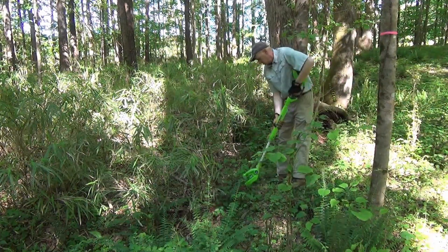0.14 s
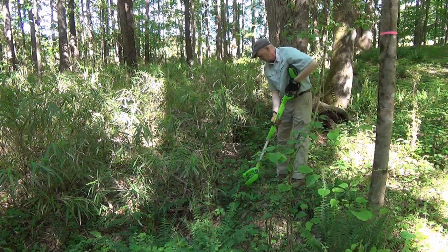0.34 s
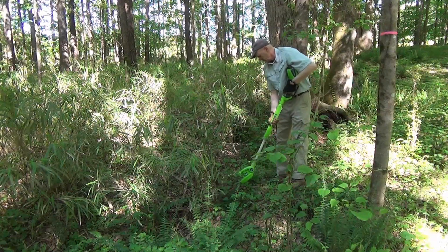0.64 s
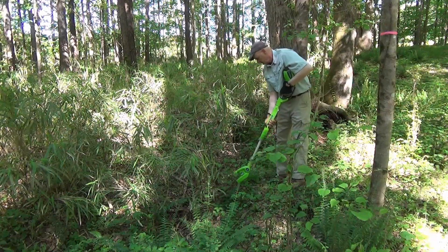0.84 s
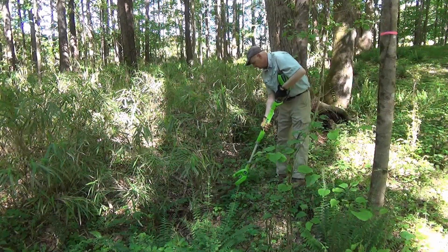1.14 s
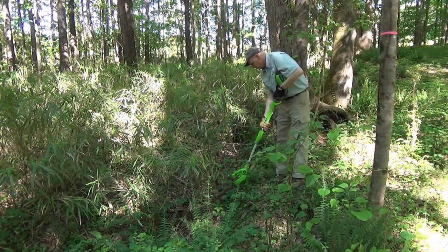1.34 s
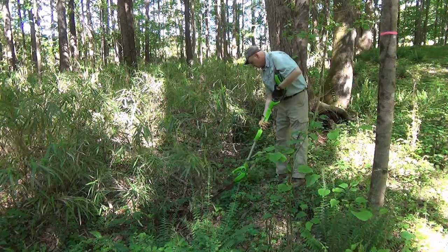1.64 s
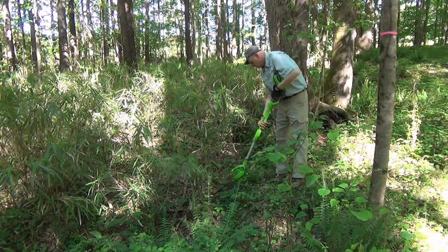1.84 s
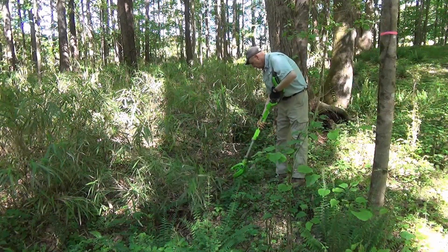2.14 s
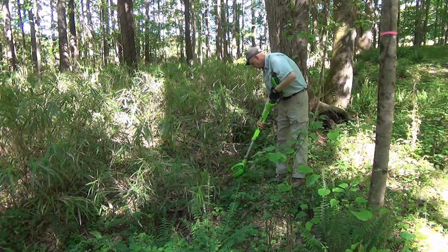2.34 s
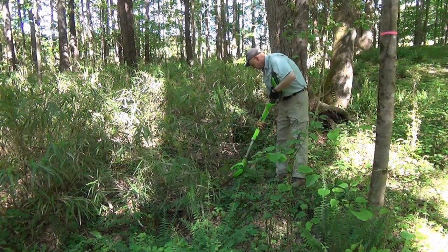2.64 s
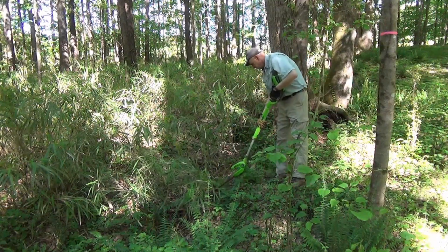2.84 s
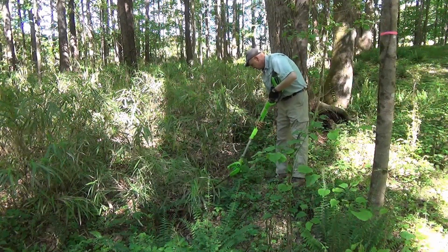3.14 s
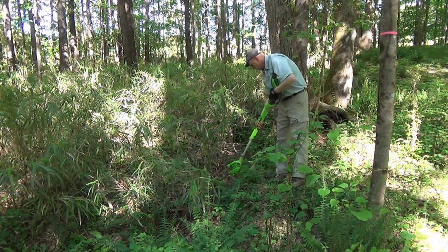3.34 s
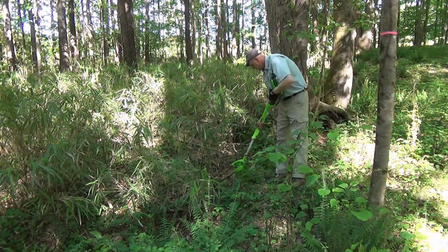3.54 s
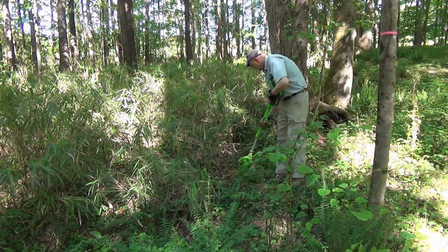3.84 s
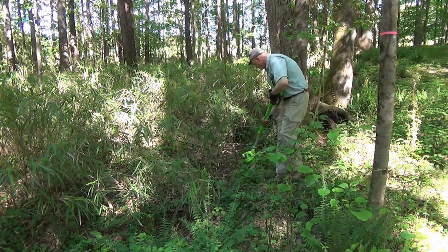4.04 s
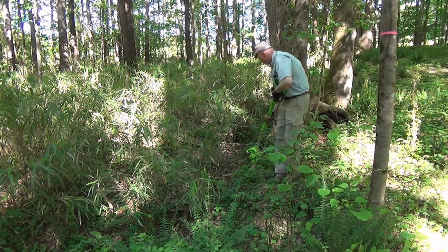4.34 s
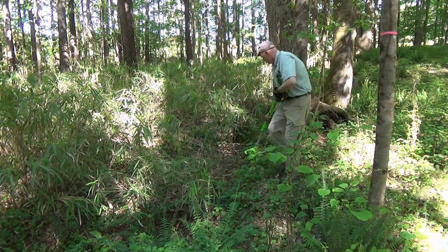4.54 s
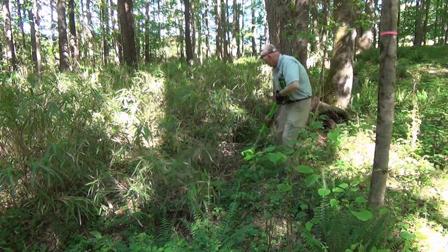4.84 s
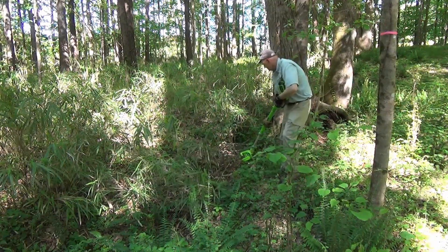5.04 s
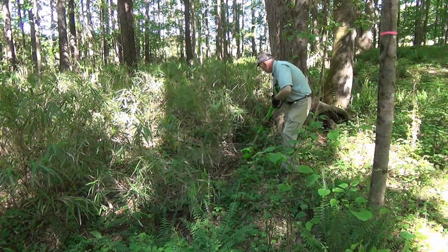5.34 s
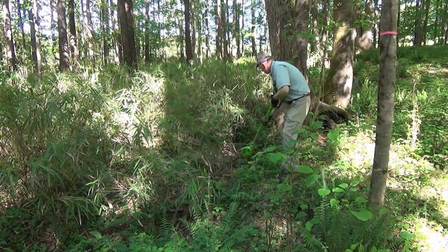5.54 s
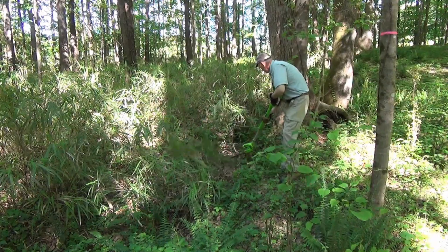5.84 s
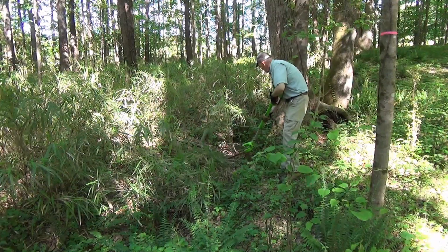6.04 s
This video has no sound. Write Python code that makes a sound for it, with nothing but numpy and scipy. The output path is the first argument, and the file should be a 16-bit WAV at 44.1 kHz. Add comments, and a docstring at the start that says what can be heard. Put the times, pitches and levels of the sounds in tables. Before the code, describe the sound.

Outdoors in woodland, two microphones face an electric pole hedge trimmer, centred in stereo. A faint leaf wash and low distant rumble with a hum open the scene. From 0.13 to 0.23 seconds small plastic trigger clicks tick, the strongest near 0.2. At 0.3 brief electronic motor tones sing and a rough gear whine climbs unevenly, while the blades knock slowly, then faster. By about 0.8 they run steadily at twenty-six cycles a second, two knocks each: a harsh, bright metallic buzz-rattle with thin ringing teeth and a hollow pole underneath. Stems snap often until 1.2, then sporadically; brush swishes near 1.6, 2.3, 2.8 and 5.4 to 5.6. The rattle eases after 1.8, its speed wavering slightly under load. From about 4 the bar sinks into weeds, sounding denser and less bright. Low rumble swells faintly around 3.5 to 4.2 and after 5.3. Sparse tree echoes follow; the trimmer is still running at the end, just past 6.

```python
"""An electric pole hedge trimmer straight ahead of two microphones in woodland, cutting through weeds.
A cam drives the blades to and fro about 26 times a second; each reversal knocks and sets off a rattle
that rings in cutter bar, teeth, housing and pole, while snapping stems shake the whole tool.
Before that the trigger clicks and the gear whine of the motor climbs to speed.
Behind are a faint wash of leaves, a far rumble that swells, with a hum, and sparse echoes from the trees."""
import sys
import numpy as np
from scipy import signal
from scipy.io import wavfile
from scipy.ndimage import uniform_filter1d

SR = 44100
rng = np.random.default_rng(int(sys.argv[2]) if len(sys.argv) > 2 else 0)


def store_wav(level_fs):
    """Save 16-bit WAV to argv[1]."""
    pcm = np.round(np.clip(np.atleast_2d(level_fs), -1, 1) * 32767)
    wavfile.write(sys.argv[1], SR, pcm.T.astype(np.int16))


N = 272489
T = np.arange(N) / SR  # time in s

# Colour of the leaf wash before its band limits: pitch_hz, density_db (per Hz, relative)
LEAF_COLOUR = [(59, -33), (100, -21), (201, -9), (276, 18), (1270, 9), (2340, 5), (6200, 3.5),
               (13300, -5.5), (15700, -47)]
# Far rumble, which fades early and partly returns at the end, before its lumps: time_s, level_db
RUMBLE = [(0, -51), (.45, -57.5), (.65, -69.5), (1.4, -72), (1.9, -84), (3.2, -91), (4.5, -78), (6.18, -70)]
# Swells of the low rumble: start_s, level_db (at the height of the swell)
RUMBLE_SWELLS = [(2.178, -69), (3.501, -61.5), (3.894, -59), (4.17, -63), (5.336, -64), (5.459, -60),
                 (6.05, -66)]
# Part of the echoes that is opposite at the two microphones: pitch_hz, level_db
SIDE_COLOUR = [(60, -17), (150, -12), (380, -16), (950, -23.5), (2380, -24), (5980, -23.5), (15000, -11)]

# Clicks of the trigger parts: start_s, level_db (peak before the band limits), brightness_db (per octave)
TRIGGER_CLICKS = [(.1257, -23, 4), (.1272, -26, 0), (.143, -35, -12), (0.158, -41, -9), (0.186, -30, -12),
                  (0.1932, -26, 5), (.195, -27, 3), (0.2016, -21, 5), (0.2036, -13, -1), (.2075, -24, -6),
                  (0.217, -30, 4), (.229, -33, -11)]
# The one trigger body that rings under every click: pitch_hz, level_db (relative), t60_s
TRIGGER_BODY = [(410, -11, .045), (1750, 1, .017), (2800, -5, .022), (4400, -9, .015), (6100, -16, .03)]

# Level of the gear whine: time_s, level_db
WHINE_LEVEL = [(.33, -48), (.352, -24), (.395, -25), (.42, -30), (.44, -34), (.462, -27), (.48, -48),
               (.63, -40), (.8, -50), (1.6, -44), (3.9, -46), (4.3, -55)]
# Gear whine races through the slack, catches the blades, sags and climbs again: time_s, pitch_hz
SPIN_UP_PITCH = [(.33, 600), (.348, 780), (.366, 1230), (.384, 860), (.401, 1130), (.425, 1470),
                 (.445, 1750), (.462, 2070), (.475, 2230), (.49, 2400)]
# Rough partial while it climbs: multiple (of the whine pitch), level_db (relative)
SPIN_UP_PARTS = [(1.5, -9)]
# Partials at full speed, the lower being the shaft: multiple (of the whine pitch), level_db (relative)
FULL_SPEED_PARTS = [(.1, -10), (1.5, -4)]
# Tones of the motor drive as current comes on: pitch_hz, level_db, start_s, end_s
DRIVE_TONES = [(1003, -44, .305, .33), (1998, -40, .297, .37), (2998, -42, .297, .35),
               (2998, -36, .35, .49), (4992, -47, .297, .35)]

# Load holds the cam back or lets it run ahead, before smoothing and sharing: time_s, lag_ms
LOAD_LAG = [(.45, 12), (.6, 2), (.78, 0), (1.3, -1.6), (2.2, 2.5), (3.1, -3.2), (3.65, -3.5), (4.33, 1.7),
            (4.6, -1.3), (5.34, -5.2), (5.8, 1.4), (6.18, .6)]
# The two reversals of a turn: at_turns (0-1), knock_db, slide_db (sliding rattle), thump_db (in the pole)
REVERSALS = [(0, 3.5, 5, 5.5), (.49, 3.5, 3.5, 2)]
# Running level before layer trims: time_s, bar_db, housing_db (above the bar)
RUNNING_LEVEL = [(.297, -41, 5), (.35, -22, -1.5), (.4, -16.5, -4.5), (.57, -22.5, -1), (.98, -21, -4),
                 (1.78, -24, -6), (2.06, -27, -6), (3.0, -27, -7), (3.47, -26, -6), (4.04, -28, -6.5),
                 (4.72, -25, -9.5), (5.3, -28.5, -7), (5.6, -25.5, -8.5), (6.18, -30.5, -8.5)]
# How far the bar is sunk in the weeds: time_s, share (0-1)
SUNK = [(.3, 0.9), (1.6, 0), (2, 0), (4.1, 0.6), (4.5, 1), (6.18, 1)]
# Broad colour of the tool: pitch_hz, density_db (per Hz, relative)
TOOL_COLOUR = [(88, -47), (150, -27), (280, -7), (438, -10), (520, -13.5), (832, -1.5), (1070, -1),
               (1250, 0), (1850, -2), (2160, -5), (3870, -0.5), (8110, 1), (10300, 1.5), (12900, -0.5),
               (15700, -15.5)]
# Resonances of the tool: pitch_hz, width_hz, clear_db (lift with the bar clear), sunk_db (lift when sunk)
TOOL_MODES = [(310, 90, 4, 4), (800, 200, 4, 2), (1040, 250, 5, 2), (1520, 130, 0, 7), (1830, 120, 3, 3.5),
              (2380, 300, 0, 5), (2950, 300, 2, 2), (3870, 190, 4, 4), (6750, 500, -3, -5),
              (7450, 280, 5, 3), (10300, 900, 2, 4)]
# Thin rings of the teeth: pitch_hz
TEETH_HZ = [9505, 9870, 10245, 10525, 11430, 11960, 12200, 12595, 13230]
# Rings of the bar that drift as it is turned and swept, one table a ring: time_s, pitch_hz, level_db (re bar)
DRIFTING_RINGS = [
    [(.4, 1790, -17), (1.4, 1804, -12), (2.3, 1840, -13), (3.7, 1860, -12), (4.5, 1827, -12),
     (6.18, 1820, -14)],
    [(.5, 3600, -15), (.85, 3900, -11), (1.4, 3860, -12), (2.5, 3860, -17), (3.7, 3850, -13),
     (4.2, 3930, -13), (6.18, 3930, -14)],
    [(.4, 2990, -14), (1.6, 2960, -14), (2.8, 2950, -20), (3.2, 3010, -16), (3.55, 2870, -12),
     (4.0, 2830, -8), (4.3, 3020, -14), (5.2, 2990, -14), (6.18, 2800, -25)],
    [(.5, 5250, -22), (.7, 5380, -15), (1.3, 5600, -14), (1.9, 5600, -15), (2.1, 5600, -40)],
    [(.6, 4300, -30), (1, 4450, -14), (1.9, 4520, -15), (2.3, 4500, -26), (3.4, 4500, -15),
     (4.2, 4400, -36)],
]
# Brush swishing through the teeth: time_s (centre), level_db (before layer trims), length_s
SWISHES = [(1.58, -34, 0.0087), (1.656, -21, 0.0079), (2.323, -29.5, 0.023), (2.842, -26.5, 0.018),
           (5.363, -25.5, 0.012), (5.585, -26, 0.0062)]
# Hardest knocks and stems snapping in the teeth: start_s, strength_db, pitch_hz (at which the bar rings on)
SNAPS = [(0.393, -13, 1090), (0.447, -24, 1200), (0.5167, -11, 1090), (0.543, -12, 4960),
         (0.568, -10, 4070), (0.6142, -8, 5390), (0.659, -8, 7690), (.699, -4, 7100), (0.776, -9, 1010),
         (0.8515, -6, 4200), (0.928, -6, 1800), (1.003, -8, 2780), (1.1534, -8, 3700), (1.609, -10, 1030),
         (1.842, -8, 5570), (2.2927, -9, 3900), (2.8156, -13, 1980), (3.116, -11, 5000),
         (3.2344, -14, 1870), (3.235, -11, 3160), (3.3816, -11, 1843), (3.6068, -9, 2810),
         (3.7966, -9, 5500), (3.892, -10.5, 2880), (4.4465, -9.5, 1440), (4.591, -10.5, 3880),
         (5.0423, -13, 5400), (4.815, -13, 5260), (4.972, -11, 5130), (5.579, -11, 2320),
         (6.125, -14, 1900)]

LEAVES_DB = -47
CLACK_DB, CLACK_T60_S = -4, .045
CAM_START_S, SPIN_UP_S, TURNS_PER_S, FIRST_TURN = .29, .53, 26.47, .21
CAM_LAG_SHARE, MOTOR_LAG_SHARE = .7, .35  # the motor feels less of the load's lag than the cam
TEETH_PER_TURN = 162.3  # gear teeth meshing in one cam turn
RISE_TURNS, KNOCK_TURNS, THUMP_LAG_TURNS, THUMP_TURNS = .039, .04, .1, .075
POLE_SLIDE = .45  # share of the sliding rattle's dB that reaches the pole
TOOTH_WIDTH_HZ, TOOTH_LIFT_DB = 70, 5
SURGE_DB, CLUMP_DB = .66, 1.3
SIZZLE_DB, SIZZLE_FADE_DB_PER_S, SIZZLE_DULL = -7.5, -.29, 3.1
POLE_DB, POLE_FOLLOWS = -28.5, .67  # the hollow pole follows the bar's level in part
DRIFT_WIDTH_HZ = 235
SNAP_S, SNAP_RING_DB, SNAP_RING_T60_S = .0016, -12, .045
EDGE_HZ = 15780


def amp(db):
    """Decibels to gain."""
    return 10 ** (np.asarray(db) / 20)


def evened(x):
    """Scales to rms 1."""
    return x / np.sqrt(np.mean(x ** 2) + 1e-20)


def curves(rows, at):
    """Every column after the first, joined by straight lines."""
    first, *columns = np.transpose(rows)
    return [np.interp(at, first, c) for c in columns]


def slow_noise(samples, passes=1):
    """Random wander of rms 1: white noise under a moving average."""
    x = rng.standard_normal(N)
    for _ in range(passes):
        x = uniform_filter1d(x, size=samples)
    return evened(x)


def coloured(x, db_at):
    """Minimum-phase (causal) filter whose level in dB is db_at(Hz)."""
    hz = abs(np.fft.fftfreq(8192, 1 / SR))
    log_gain = np.log(amp(np.maximum(db_at(hz), -100)))
    phase = -signal.hilbert(log_gain).imag
    taps = np.fft.ifft(np.exp(log_gain + 1j * phase)).real[:4096]
    return signal.oaconvolve(x, taps)[:N]


def spectrum(points, hz):
    """Reads (Hz, dB) points on a log-frequency axis."""
    f, db = np.transpose(points)
    return np.interp(np.log(hz + 1), np.log(f + 1), db)


def band(hz, lo_hz, hi_hz):
    """Steep band-pass in dB."""
    return -10 * np.log10((1 + (lo_hz / (hz + 1)) ** 12) * (1 + (hz / hi_hz) ** 12))


def resonate(x, hz, width):
    """Moving resonance of rms 1: shifts the curve hz down to zero, smooths, and shifts back."""
    turn = np.exp(2j * np.pi * np.cumsum(hz * np.ones(len(x))) / SR)
    r = np.exp(-np.pi * width / SR)
    smooth = signal.lfilter([1 - r], [1, -r], x / turn)
    return evened((turn * smooth).real)


def air():
    """Woodland behind the tool: leaf wash is broad noise, the rumble swelling low noise, the hum a sine."""
    wash = [coloured(rng.standard_normal(N), lambda hz: spectrum(LEAF_COLOUR, hz) + band(hz, 170, 17000))
            for _ in range(3)]
    low = [evened(coloured(rng.standard_normal(N), lambda hz: band(hz, 50, 172))) for _ in range(2)]
    lumps_db = np.minimum(T, 1) * 2.5 * slow_noise(4000)
    rumble = amp(curves(RUMBLE, T)[0]) * amp(lumps_db)
    swells = sum(amp(db) * np.exp(-((T - s - .03) / .037) ** 2) for s, db in RUMBLE_SWELLS)
    hum = .8 * rumble * np.sin(2 * np.pi * 63 * T)
    # a shared part in the middle, a little of its own at each microphone
    leaves = amp(LEAVES_DB) * evened(wash[0] + .084 * np.array(wash[1:]))
    low_stereo = low[0] + np.array([[.17], [-.17]]) * low[1]
    return leaves + hum + (rumble + swells) * low_stereo


def scattered(x, t60):
    """Sparse echoes of random sign from trunks and brush, dying away by 60 dB in t60 seconds."""
    t = np.arange(SR // 3) / SR
    hits = rng.choice([-1, 1], len(t)) * (rng.random(len(t)) < .05)
    taps = hits * amp(-60 * t / t60) * (t > .002)
    return signal.oaconvolve(x, taps / np.linalg.norm(taps))[:N]


def patchy(x, patchy_db):
    """The tool's colour varies at random in soft patches of time and pitch."""
    z = signal.stft(x, nperseg=512, noverlap=384)[2]
    patches = rng.standard_normal(z.shape[::-1]).T
    for _ in range(2):
        patches = uniform_filter1d(uniform_filter1d(patches, size=4, axis=0), size=30, axis=1)
    return signal.istft(z * amp(patchy_db * evened(patches)), nperseg=512, noverlap=384)[1][:N]


def trigger():
    """Plastic clicks: a dry clack of noise over the decaying modes of the trigger body."""
    out, t = np.zeros(N), np.arange(3000) / SR
    for s, db, tilt_db in TRIGGER_CLICKS:
        body = sum(amp(d + tilt_db * np.log2(hz / 1500) - 60 * t / t60) * np.sin(2 * np.pi * hz * t)
                   for hz, d, t60 in TRIGGER_BODY)
        # a brighter click has a higher and wider clack
        noise = resonate(rng.standard_normal(len(t)), 1800 * amp(tilt_db), width=2000 * amp(tilt_db))
        click = body + amp(CLACK_DB - 60 * t / CLACK_T60_S) * noise
        out[round(s * SR):][:len(t)] += amp(db) * click / abs(click).max()
    return coloured(out, lambda hz: band(hz, 330, 11000))


def cam_turns(lag_share):
    """Turns of the cam so far: speed gained along a quarter sine, then steady, shifted by the load."""
    lag_s = lag_share * uniform_filter1d(curves(LOAD_LAG, T)[0], size=9000) / 1000
    t = T - lag_s - CAM_START_S
    rise = 1 - np.cos(np.pi / 2 * np.clip(t / SPIN_UP_S, 0, 1))
    return FIRST_TURN + TURNS_PER_S * (rise * SPIN_UP_S * 2 / np.pi + np.maximum(t - SPIN_UP_S, 0))


def drive_tones():
    """The motor drive sings: brief steady sines with softened ends."""
    out = np.zeros(N)
    for hz, db, start, end in DRIVE_TONES:
        held = uniform_filter1d(1. * (T > start) * (T < end), size=300)
        out += np.sqrt(2) * amp(db) * held * np.sin(2 * np.pi * hz * T)
    return out


def motor():
    """Gear whine at the tooth-meshing rate, growling as narrow noise while it climbs, plus drive tones."""
    mesh_hz = TEETH_PER_TURN * SR * np.gradient(cam_turns(MOTOR_LAG_SHARE))
    climbing = T < SPIN_UP_PITCH[-1][0]
    hz = uniform_filter1d(np.where(climbing, curves(SPIN_UP_PITCH, T)[0], mesh_hz), size=200)
    waver = slow_noise(1500)
    phase = 2 * np.pi * np.cumsum(hz * (1 + .0012 * waver)) / SR
    growl = resonate(rng.standard_normal(N), hz, width=92)
    for k, db in SPIN_UP_PARTS:
        growl += 2 * amp(db) * resonate(rng.standard_normal(N), k * hz, width=100)
    steady = np.clip((T - .7) / .3, 0, 1)  # 0 while climbing, 1 at full speed
    whine = np.sin(phase) + .4 * (1 - steady) * growl
    whine += steady * amp(2.3 * waver) * sum(amp(db) * np.sin(k * phase) for k, db in FULL_SPEED_PARTS)
    level = np.sqrt(2) * amp(curves(WHINE_LEVEL, T)[0]) * (T > WHINE_LEVEL[0][0])
    return level * whine + drive_tones()


def tool(x, lo_hz, hi_hz):
    """The part of the tool that rings between two frequencies, blended from bar clear to bar sunk in weeds."""
    sunk = curves(SUNK, T)[0]
    modes = TOOL_MODES + [(f, TOOTH_WIDTH_HZ, TOOTH_LIFT_DB, TOOTH_LIFT_DB) for f in TEETH_HZ]

    def rung(column):
        def response_db(hz):
            lifts = sum(m[column] / (1 + (2 * (hz - m[0]) / m[1]) ** 2) for m in modes)
            return spectrum(TOOL_COLOUR, hz) + band(hz, lo_hz, hi_hz) + lifts
        return coloured(x, response_db)

    clear, deep = rung(2), rung(3)
    return (1 - sunk) * clear / np.std(clear) + sunk * deep / np.std(deep)


def snaps():
    """Short noise bursts that shake the whole tool, each leaving one part of the bar ringing."""
    kicks, rings, t = np.zeros(N), np.zeros(N), np.arange(3000) / SR
    for s, db, hz in SNAPS:
        at = round(s * SR)
        noise = rng.standard_normal(len(t))
        kick = amp(db) * noise * t / SNAP_S * np.exp(1 - 2 * t / SNAP_S)
        fade = (1 - np.exp(-t / .002)) * amp(db + SNAP_RING_DB - 60 * t / SNAP_RING_T60_S)
        ring = fade * np.sin(2 * np.pi * hz * t + noise[0])  # random phase
        kicks[at:][:len(t)] += kick[:N - at]
        rings[at:][:len(t)] += ring[:N - at]
    return amp(-3) * tool(kicks, 700, 8900) * np.std(kicks) + rings


def chatter(per_s, spread_db, hiss):
    """Tiny metal contacts of uneven size over sliding noise."""
    size_db = spread_db * np.minimum(rng.exponential(1, N), 4)
    contacts = amp(size_db) * (rng.random(N) < per_s / SR) * rng.choice([-1, 1], N)
    return evened(evened(contacts) + hiss * rng.standard_normal(N))


def strokes(turns):
    """Rattle strength in dB for bar and pole: each reversal knocks, then slides until the next."""
    bar, pole = 0, 0
    for at, knock_db, slide_db, thump_db in REVERSALS:
        u = (turns - at) % 1
        slide = slide_db * np.maximum(1 - (2 * u) ** 2, 0)
        bar = bar + np.minimum(u / RISE_TURNS, 1) * (knock_db * np.exp(-u / KNOCK_TURNS) + slide)
        pole = pole + POLE_SLIDE * slide + thump_db * np.exp(-((u - THUMP_LAG_TURNS) / THUMP_TURNS) ** 2)
    return np.array([bar, pole])


def swished(run_db):
    """Running level in dB with each swish of brush added in power."""
    return run_db + sum(10 * np.log10(1 + amp(2 * (db - run_db)) * np.exp(-((T - s) / length) ** 2))
                        for s, db, length in SWISHES)


def drifting_rings(drive, level_db):
    """Rings of the bar that answer the knocks: moving resonances with a slightly wavering pitch."""
    out = np.zeros(N)
    for ring in DRIFTING_RINGS:
        hz, db = curves(ring, T)
        hz = hz * (1 + .007 * slow_noise(3000))
        once = resonate(drive, hz, DRIFT_WIDTH_HZ)
        out += amp(level_db + db) * resonate(once, hz, DRIFT_WIDTH_HZ)
    return out


def trimmer():
    """Rattles shaped by the cam's reversals, heard through bar, teeth, housing and pole."""
    turns = cam_turns(CAM_LAG_SHARE)
    stroke_db, pole_db = strokes(turns) * np.clip((T - .35) / .2, .3, 1)  # slow strokes are gentle
    luck = np.clip(rng.standard_normal((320, 3)), -2, 2)  # no two strokes are equally hard
    shared, fine, low = uniform_filter1d(luck[(2 * turns).astype(int)], size=150, axis=0).T

    run_db, housing_db = curves(RUNNING_LEVEL, T)
    # uneven brush makes the rattle swell a few times a second
    level_db = swished(run_db) + SURGE_DB * slow_noise(2500, passes=2)
    slow_db = -12 * np.clip((.49 - T) / .15, 0, 1)  # a slow bar excites little treble
    sizzle_db = SIZZLE_DB + SIZZLE_FADE_DB_PER_S * T + SIZZLE_DULL * slow_db

    clumps = amp(CLUMP_DB * slow_noise(120, passes=2))  # contacts come in clumps a few milliseconds long
    rattle = clumps * chatter(per_s=4000, spread_db=2.6, hiss=1.2)
    bar = rattle * amp(stroke_db + .5 * shared)
    sizzle = chatter(per_s=8000, spread_db=1.5, hiss=3) * amp(.5 * stroke_db + .5 * shared + .6 * fine)
    housing = rattle * amp(stroke_db + .28 * shared + .1 * low)
    drive = clumps * chatter(per_s=3000, spread_db=2.5, hiss=1) * amp(1.2 * stroke_db + .6 * shared)

    out = amp(level_db - 5) * tool(bar, 1108, 2836)
    out += amp(level_db - 2.5 + slow_db) * tool(bar, 2420, 6480)
    out += amp(level_db + sizzle_db) * tool(sizzle, 7500, 17000)
    out += amp(level_db + housing_db) * tool(housing, 521, 1413)
    out += amp(POLE_DB + POLE_FOLLOWS * run_db + .5 * slow_db) * tool(rattle * amp(pole_db), 175, 465)
    out += drifting_rings(drive, level_db + slow_db)
    return patchy(out * (T > RUNNING_LEVEL[0][0]), patchy_db=.7)


def scene():
    """The tool straight ahead; echoes add in the middle and differ a little between the microphones."""
    dry = trimmer() + snaps() + motor() + trigger()
    mid = dry + amp(-15) * scattered(dry, t60=.23)
    side = coloured(scattered(dry, t60=.3), lambda hz: spectrum(SIDE_COLOUR, hz))
    stereo = mid + side * np.array([[1], [-1]]) + air()
    return stereo * amp([[-.15], [.15]])  # the right microphone is slightly louder


def record(dry):
    """Both microphones end at a steep upper band limit."""
    low_pass = signal.firwin(2047, EDGE_HZ, window=("kaiser", 9), fs=SR)
    return signal.oaconvolve(dry, low_pass[None], "same")


dry = scene()
out = record(dry)
store_wav(out)
```